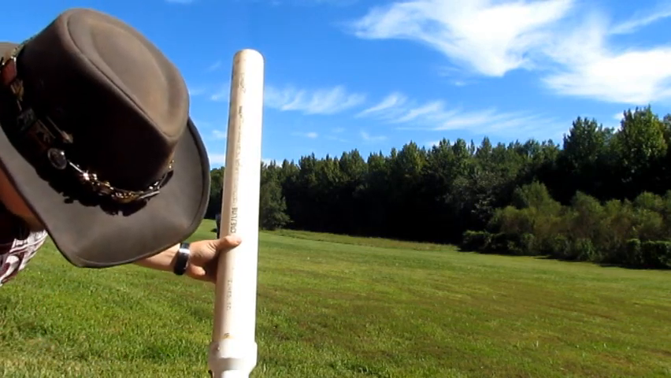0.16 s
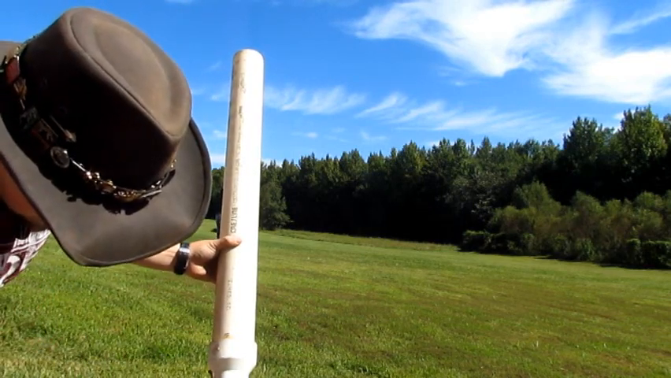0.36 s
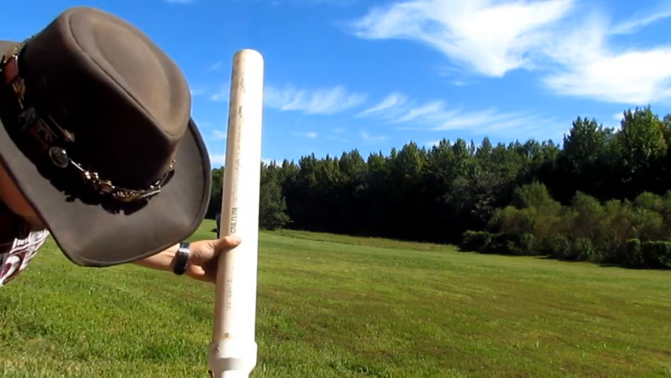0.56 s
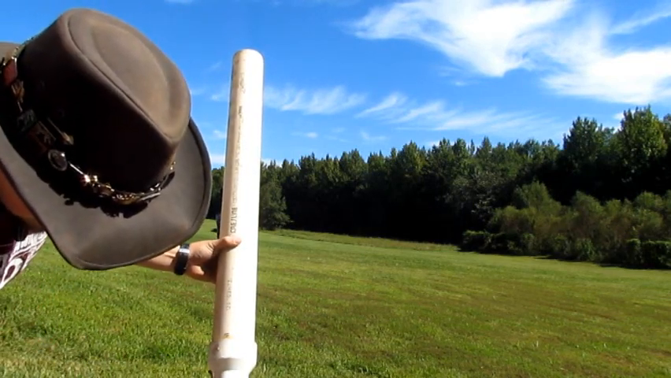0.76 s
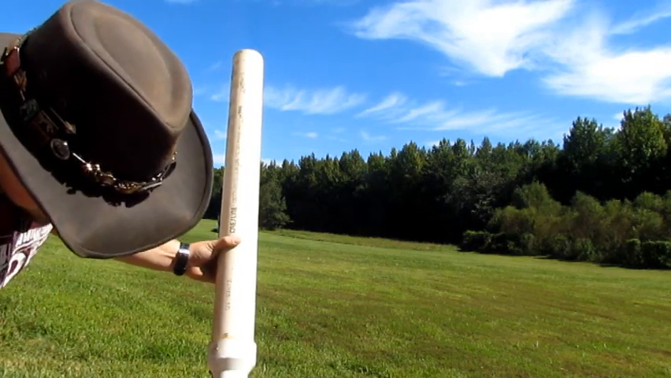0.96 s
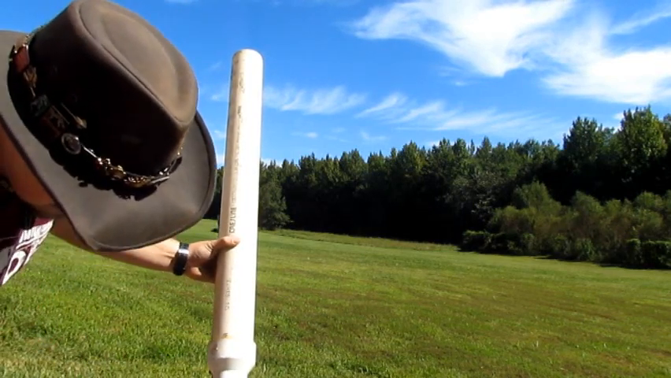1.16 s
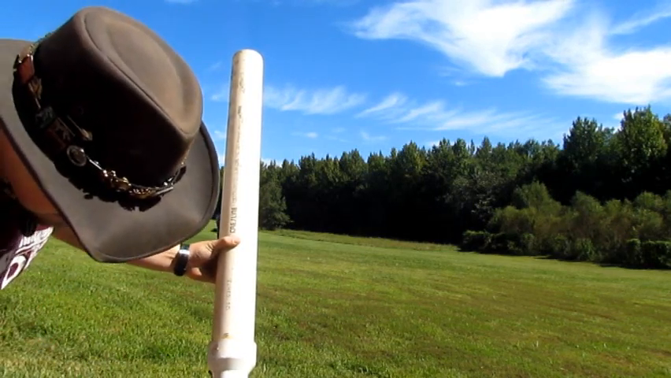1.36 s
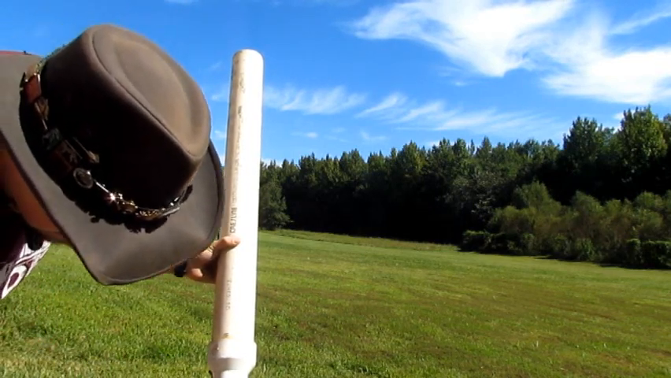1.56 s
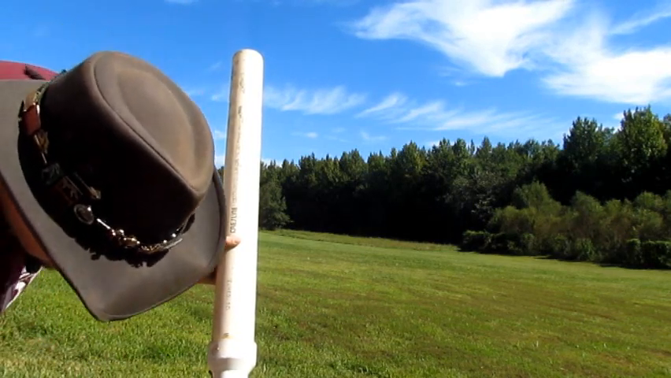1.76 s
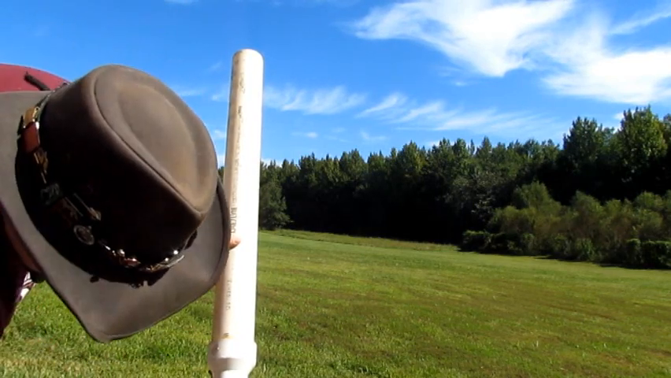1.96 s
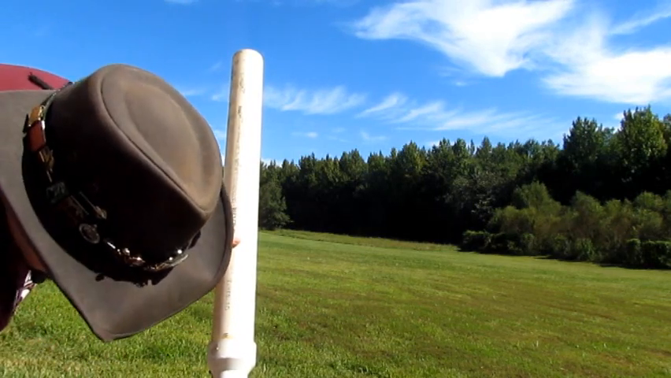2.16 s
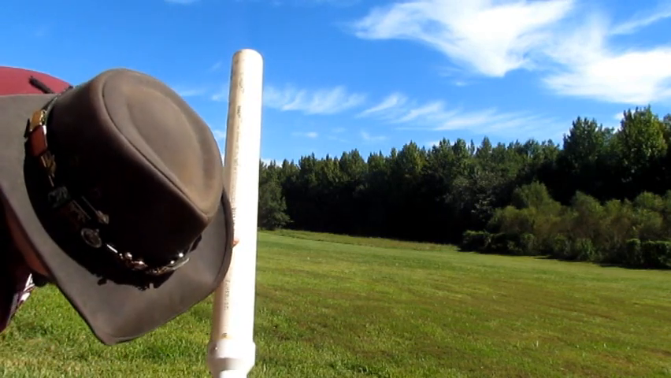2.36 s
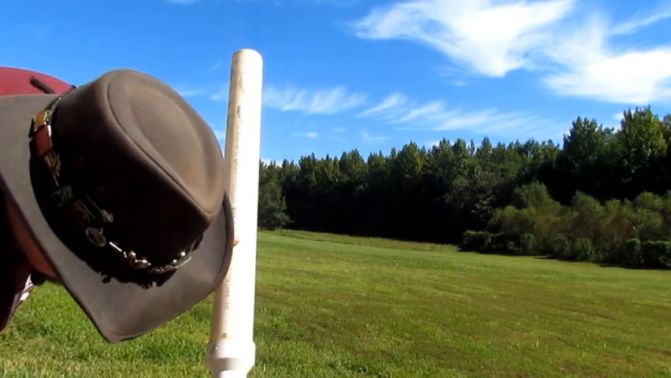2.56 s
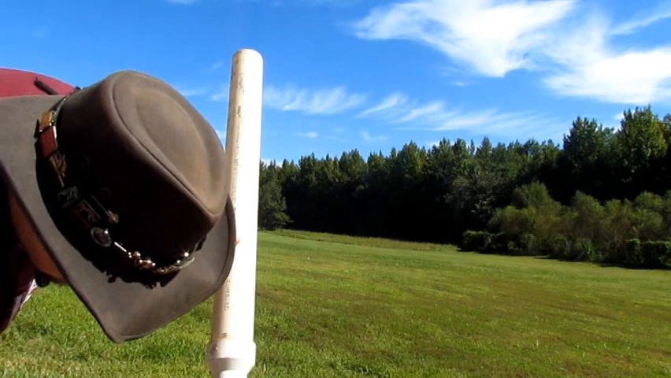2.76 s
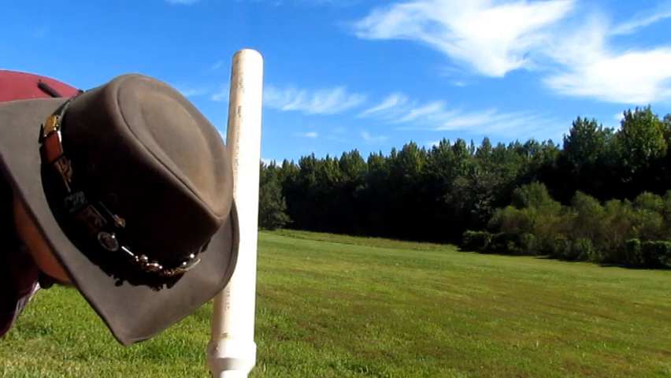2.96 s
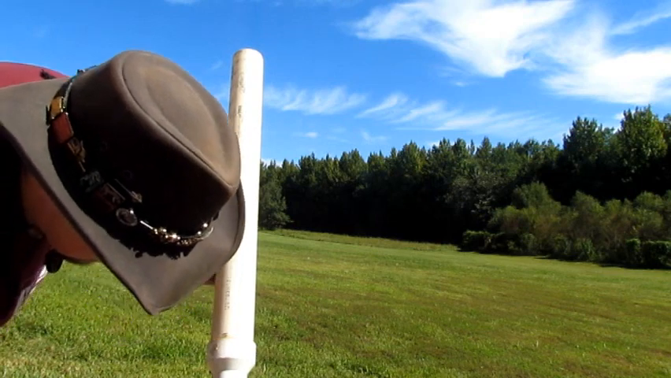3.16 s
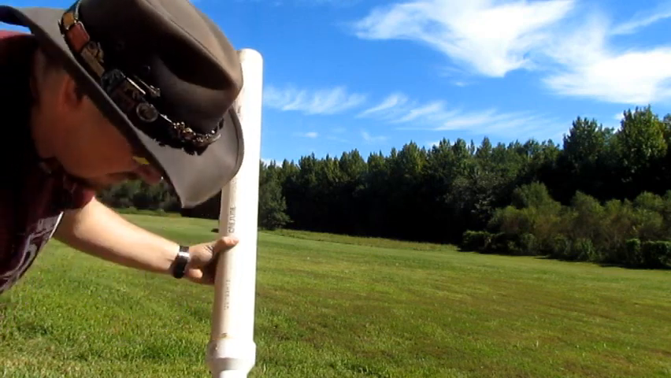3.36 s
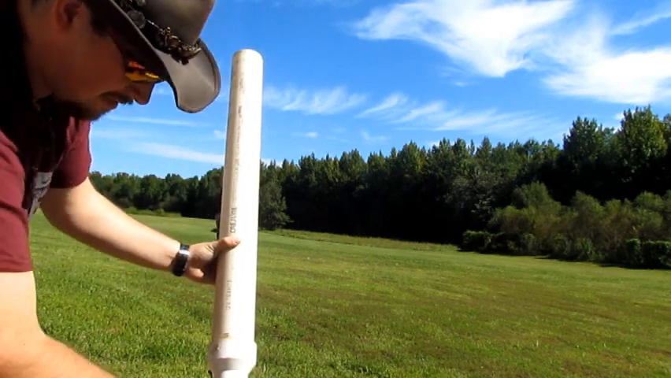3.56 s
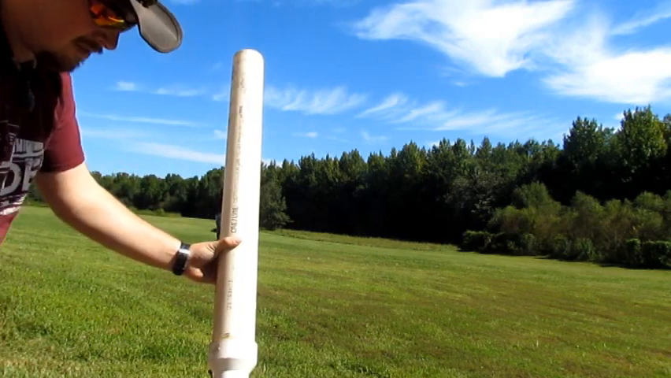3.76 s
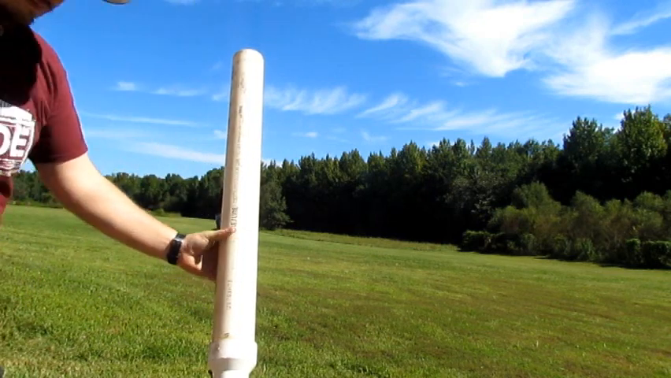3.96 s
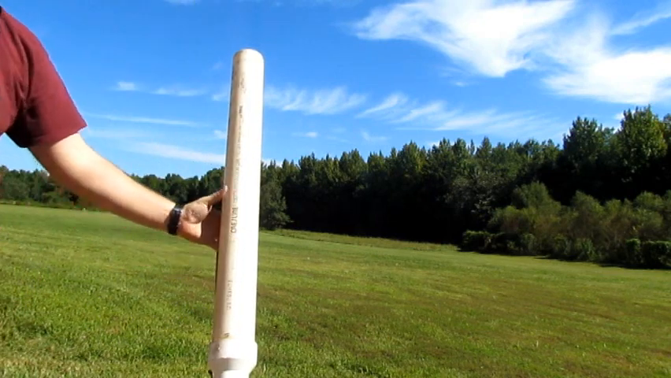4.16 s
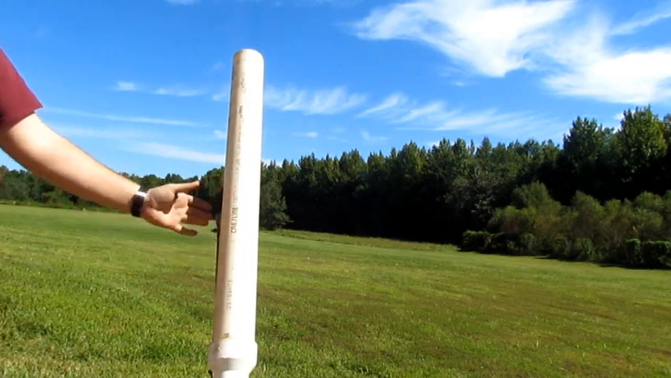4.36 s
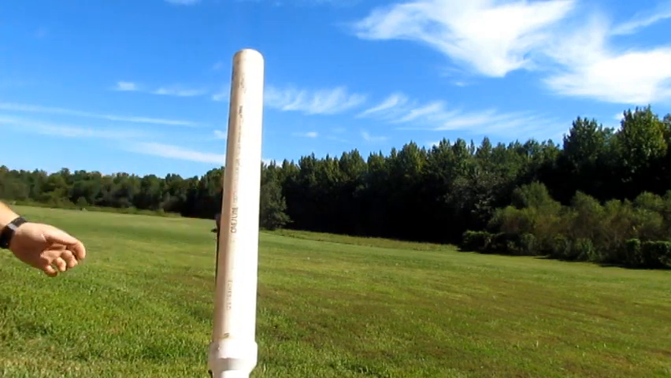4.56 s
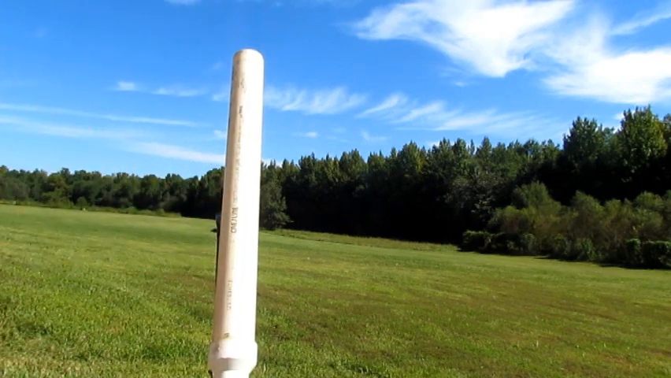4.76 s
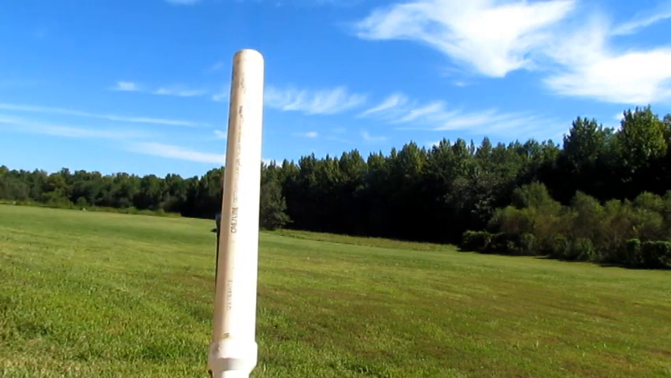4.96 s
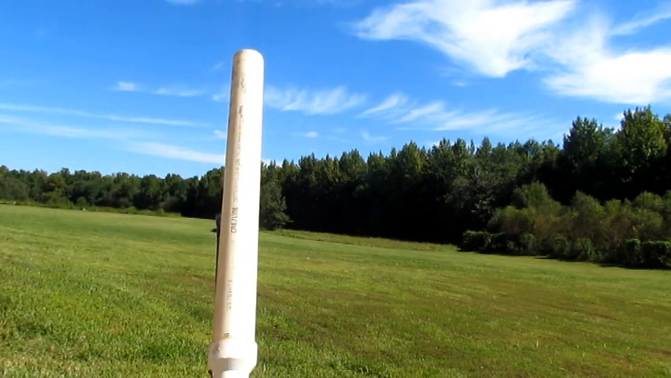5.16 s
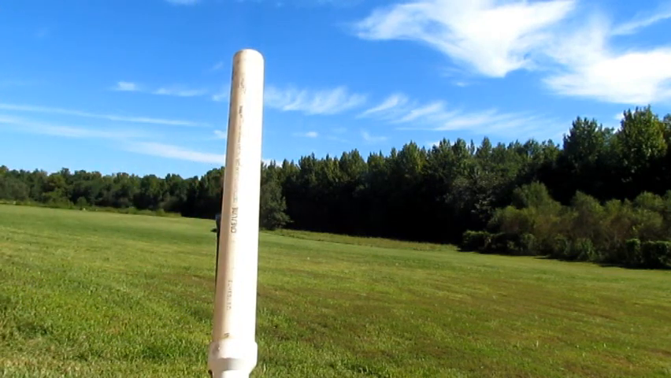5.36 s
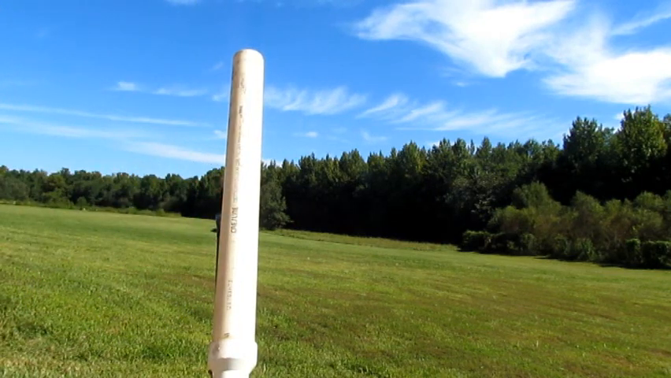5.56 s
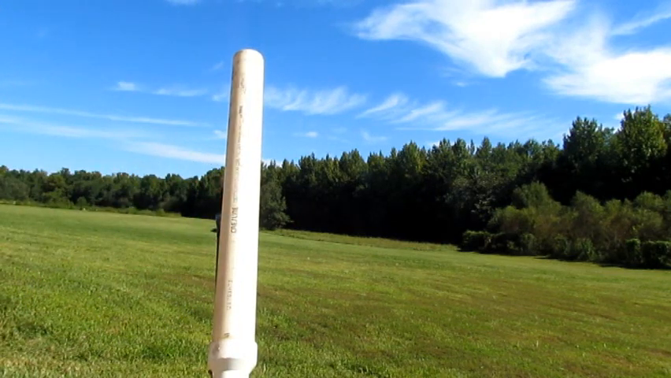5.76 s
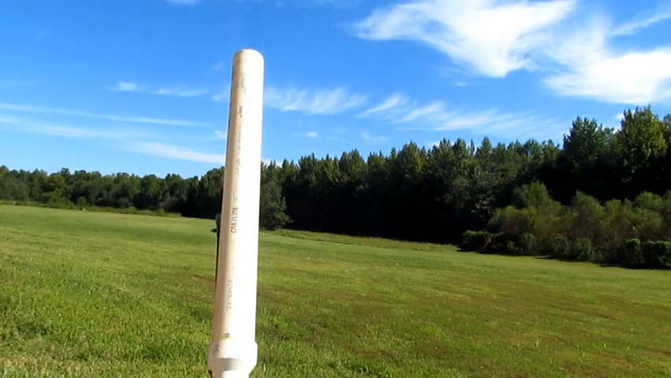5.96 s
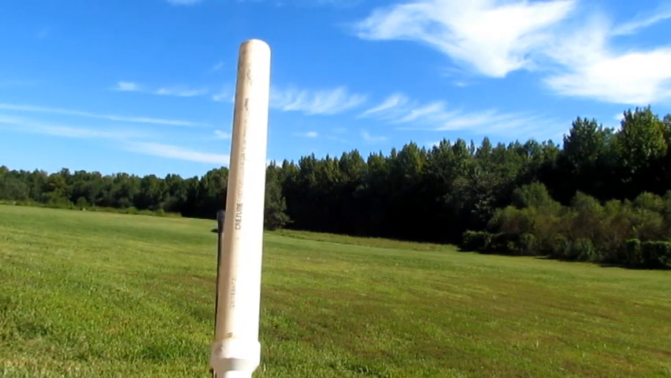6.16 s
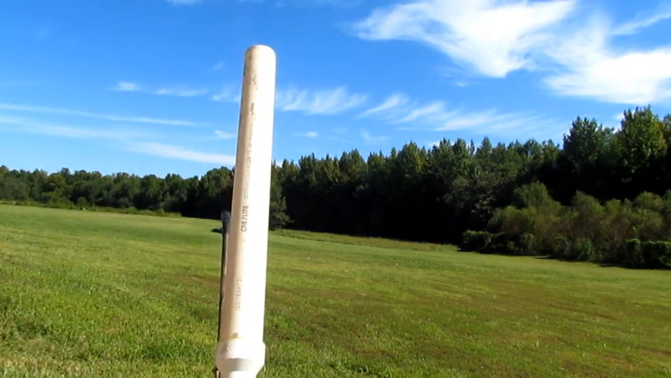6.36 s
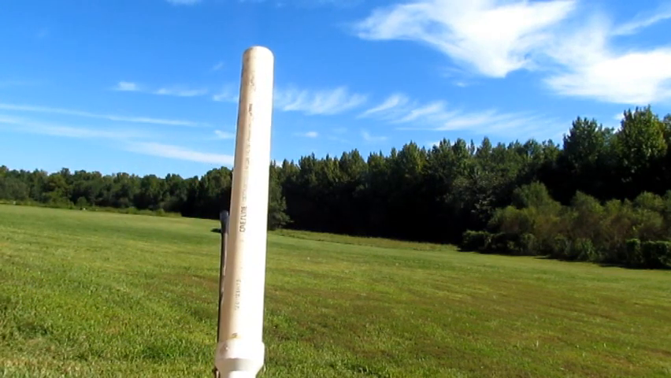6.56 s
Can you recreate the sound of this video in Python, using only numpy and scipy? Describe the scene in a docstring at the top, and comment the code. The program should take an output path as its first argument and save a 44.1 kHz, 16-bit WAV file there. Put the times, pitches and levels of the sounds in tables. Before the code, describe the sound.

In an open mown field, throbbing cicadas and chirping katydids buzz steadily all round. Hands faintly tap and brush a plastic pipe, a valve spits a short shrill hiss, dry crackle and a sharp fitting click follow. After a pause, a close compressed-air cannon fires a roaring bang; a dull wash and slaps return from the trees. Close stereo microphones; insects duck after loud sounds.

```python
"""The roaring bang of a compressed-air potato cannon, close by in a mown field; the tree line throws it back.
Before it, air spits from the filling valve, hands shift on the plastic pipe and a fitting clicks.
Air jets are coloured noise under envelopes; hard contacts are knocks and grit ringing resonances.
Cicadas and katydids, made of narrow noise bands and pulsed tones, sing all round two microphones.
The recorder's gain control ducks everything after loud sounds and recovers slowly."""
import sys
import numpy as np
from scipy import signal
from scipy.fft import rfft, irfft, next_fast_len
from scipy.io import wavfile
from scipy.ndimage import uniform_filter1d

SR = 44100
rng = np.random.default_rng(int(sys.argv[2]) if len(sys.argv) > 2 else 0)


def digitize_waveform(pressure):
    """Quantize a signal to 16-bit integers and store it at the path in sys.argv[1].

    Rows of a 2-D input are taken as channels; values are limited to [-1, 1].
    """
    field = np.atleast_2d(pressure).T
    bounded = np.clip(field, -1, 1)
    quanta = np.round(bounded * 32767).astype(np.int16)
    wavfile.write(sys.argv[1], SR, quanta)


N = 291501
TIME = np.arange(N) / SR
SIZE = next_fast_len(N, True)
BINS = np.maximum(np.arange(SIZE // 2 + 1) * SR / SIZE, 1)   # spectrum frequencies [Hz]

# the main valve unseats, then opens fully
UNSEAT_S, OPEN_S = 6.119, 6.157
# colour of the roar: (frequency [Hz], level [dB])
ROAR_COLOUR = [(60, -17), (150, -18), (300, -12), (480, -3.5), (780, 2), (1050, -4), (1500, -6),
               (2400, -5.5), (3800, -7), (5500, -7), (9000, -16.5), (15000, -42)]
# colour of the escaping hiss: (frequency [Hz], level [dB])
ROAR_HISS_COLOUR = [(1500, -11), (3500, -6), (5500, -7), (7500, -2.5), (10500, -1), (12500, -7),
                    (15500, -18)]
# colour of the deep boom: (frequency [Hz], level [dB])
BOOM_COLOUR = [(25, -18), (60, -14), (110, -8), (190, 1.5), (260, -11), (370, 3.5), (700, -34), (2000, -45)]
# narrow peaks in the roar's colour: (frequency [Hz], width [Hz], lift [dB])
ROAR_PEAKS = [(504, 43, 5), (668, 30, 2.5), (775, 90, 0), (1266, 60, 5.5), (1505, 96, 8.5), (1790, 41, 10),
              (1940, 68, 7), (2300, 80, 1), (2490, 40, 7), (2710, 46, 8), (3800, 120, 4), (5170, 90, -4)]


def shot(pop_s=6.137, pop_width_s=0.00031):
    """The valve cracks open, a pulse leaves the muzzle and the tank empties; hiss dies first, boom last."""
    leak = envelope(UNSEAT_S, level_db=-28, attack_s=.003, hold_s=.014,
                    slope_db_per_s=-750, release_db_per_s=250)
    pushed_air = envelope(pop_s - pop_width_s * 8, level_db=-29.5, attack_s=.003, hold_s=.02,
                          slope_db_per_s=-350, release_db_per_s=300)
    roar = envelope(OPEN_S, level_db=3.8, attack_s=.02, hold_s=.096, slope_db_per_s=3, release_db_per_s=440)
    hiss = envelope(OPEN_S, level_db=1.5, attack_s=.02, hold_s=.06, slope_db_per_s=50, release_db_per_s=330)
    boom = envelope(OPEN_S, level_db=-17, attack_s=.014, hold_s=.095, slope_db_per_s=72, release_db_per_s=230)
    ragged = from_db(2.2 * drift(120))
    roar = (pushed_air + roar) * ragged * turbulence(ROAR_COLOUR, alike=0.85, resonances=ROAR_PEAKS)
    hiss = (leak + hiss) * from_db(1.1 * drift(120)) * turbulence(ROAR_HISS_COLOUR, alike=0.39)
    boom = boom * turbulence(BOOM_COLOUR, alike=0.85)
    pop = muzzle_pulse(pop_s, pop_width_s)
    blast = place(roar + roar_surges() + boom + pop, pan_db=-0.4, lag=-1.1)
    return blast + place(hiss, pan_db=-0.5, lag=-.55)


def muzzle_pulse(pop_s, width_s):
    """A pressure pulse at the muzzle: one push outward, then an equal suction."""
    age = (TIME - pop_s) / width_s
    return -from_db(-21) * age * np.exp(-age ** 2 / 2)


def roar_surges(count=6, span_s=.105, length_s=.012, low_hz=450, high_hz=2000, width_share=.55):
    """Short noise surges at random pitches and slightly random times roughen the roar."""
    rows = []
    for k, (when, pitch) in enumerate(rng.random((count, 2))):
        hz = low_hz * (high_hz / low_hz) ** pitch
        start_s = OPEN_S + length_s + span_s * (k + when) / count
        rows.append((start_s, -1.5, hz, width_share * hz, length_s))
    return puffs(rows, alike=1.0, rise=0.26)


# colour of the wash from the trees: (frequency [Hz], level [dB])
TREE_COLOUR = [(40, -18), (160, -11), (400, -0.5), (800, 1), (1500, -2), (2800, 0), (4500, -4), (7000, -12),
               (11000, -14.5), (15000, -38)]
# distinct slaps from the tree line: (time [s], level [dB])
TREE_SLAPS = [(6.432, -12.5), (6.454, -18), (6.488, -14.5), (6.5085, -17), (6.546, -24)]
# bands of each slap: (frequency [Hz], width [Hz], level [dB])
SLAP_BANDS = [(720, 1300, 0), (3200, 2600, -5)]
SLAP_S = .008


def tree_line():
    """The bang comes back from the trees as a dull wash with a few slaps and a sinking rumble."""
    wash = envelope(6.29, level_db=-18, attack_s=.14, hold_s=.07, slope_db_per_s=-45, release_db_per_s=75)
    wash = wash * from_db(0.86 * drift(80)) * turbulence(TREE_COLOUR, alike=0.52)
    rows = [(s, db + level, hz, width, SLAP_S) for s, db in TREE_SLAPS for hz, width, level in SLAP_BANDS]
    slaps = puffs(rows, alike=1.0, rise=0.15)
    return place(wash + slaps + returning_rumble(), pan_db=-1.0, lag=1.0)


def returning_rumble(start_s=6.488, start_hz=200, fall_hz_per_s=380):
    """The low end of the shot comes back late: two narrow noise bands sinking in pitch."""
    hz = start_hz - fall_hz_per_s * np.clip(TIME - start_s, 0, None)
    level = envelope(start_s, level_db=-24, attack_s=.016, hold_s=.02, slope_db_per_s=-60, release_db_per_s=110)
    return level * (rasp(hz, width_hz=60) + .45 * rasp(1.8 * hz, width_hz=90))


VENT_S = 2.238   # the filling valve starts to spit
# colour of the shrill top: (frequency [Hz], level [dB])
VENT_TOP_COLOUR = [(5000, -8), (7400, -4.5), (8700, -11), (10400, 1.5), (11700, -3), (13500, -11),
                   (15500, -27)]
# colour of the hiss: (frequency [Hz], level [dB])
VENT_HISS_COLOUR = [(1000, -37), (1800, -8), (2600, -2.5), (3500, -3.5), (4300, -2), (5700, 0.5),
                    (7500, -9.5), (9000, -1.5), (12000, -15)]
# colour of the low rush: (frequency [Hz], level [dB])
VENT_RUSH_COLOUR = [(60, -22), (250, -17.5), (550, -1), (900, -1), (1150, -9.5), (1600, -1), (2500, -12),
                    (4000, -57)]
# valve resonances: (frequency [Hz], width [Hz], lift [dB])
VALVE_RESONANCES = [(943, 80, 11), (1320, 98, 12), (3090, 66, 8.5), (3500, 190, 9), (4790, 160, 1),
                    (5850, 300, 4), (7350, 340, 8), (10530, 300, 4)]


def filling_valve():
    """A spit of air: the shrill top weakens as the pressure falls, while a duller hiss swells."""
    top = envelope(VENT_S, level_db=-14.2, attack_s=.02, hold_s=.145, slope_db_per_s=-100, release_db_per_s=450)
    hiss = envelope(VENT_S, level_db=-24.5, attack_s=.022, hold_s=.072, slope_db_per_s=105, release_db_per_s=185)
    rush = envelope(VENT_S, level_db=-33, attack_s=.035, hold_s=.19, slope_db_per_s=-22, release_db_per_s=400)
    top = top * from_db(0.99 * drift(82)) * turbulence(VENT_TOP_COLOUR, 0.67, VALVE_RESONANCES)
    hiss = hiss * from_db(1.1 * drift(120)) * turbulence(VENT_HISS_COLOUR, 1.0, VALVE_RESONANCES)
    rush = rush * from_db(1.1 * drift(60)) * turbulence(VENT_RUSH_COLOUR, 0.99, VALVE_RESONANCES)
    body = place(hiss + rush + valve_stem(), pan_db=-0.8, lag=-1.2)
    return body + place(top, pan_db=-2.5, lag=-0.68)


# short squeaks of the valve: (time [s], level [dB], pitch [Hz])
VALVE_SQUEAKS = [(2.252, -24, 7450), (2.303, -24, 3560), (2.311, -21, 5730)]
# the stem jolts as it is pressed: (time [s], level [dB])
STEM_JOLTS = [(2.269, -41), (2.28, -42)]
SQUEAK_WIDTH_HZ, SQUEAK_S = 230, .018
JOLT_HZ, JOLT_WIDTH_HZ, JOLT_S = 270, 520, .008


def valve_stem():
    """The pressed stem jolts twice as low bursts; squeaks are short narrow bursts."""
    squeaks = [(s, db, hz, SQUEAK_WIDTH_HZ, SQUEAK_S) for s, db, hz in VALVE_SQUEAKS]
    jolts = [(s, db, JOLT_HZ, JOLT_WIDTH_HZ, JOLT_S) for s, db in STEM_JOLTS]
    return puffs(squeaks + jolts, alike=0.95, rise=0.19)


# light ticks of the hand on the pipe: (time [s], level [dB])
HAND_TICKS = [(.899, -38), (.927, -42), (1.848, -37), (2.626, -39), (3.726, -29), (3.733, -28), (3.76, -30),
              (3.847, -28), (3.912, -34)]
# pipe wall resonances: (frequency [Hz], width [Hz], level [dB])
PIPE_RESONANCES = [(1350, 460, -7), (1800, 450, -3), (3200, 640, 3), (4300, 990, 2)]
# plastic fitting clicks: (time [s], level [dB])
FITTING_CLICKS = [(4.4045, -13.5), (4.4365, -26), (4.4445, -24), (4.4745, -22), (4.509, -31)]
# fitting resonances: (frequency [Hz], width [Hz], level [dB])
FITTING_RESONANCES = [(1234, 55, 4), (1720, 210, -3), (2320, 320, -3.5), (3860, 460, -3), (5150, 380, 2),
                      (7240, 1700, -5), (10000, 1900, -5.5), (12300, 1200, -4.5)]
# dry crackle underfoot: (time [s], level [dB])
FOOT_CRACKLE = [(3.6324, -16), (3.6416, -12), (3.6454, -12), (3.6504, -17), (3.6574, -17), (3.6604, -13),
                (3.6674, -18)]
# crackle resonances: (frequency [Hz], width [Hz], level [dB])
TWIG_RESONANCES = [(1400, 2400, -20), (2880, 1140, -5), (3640, 790, 2.5), (4430, 910, -1), (6700, 2000, -7),
                   (10900, 3300, -10.5)]


def handling():
    """Hands on the pipe, a crackle underfoot and fitting clicks: each hard contact rings its body."""
    ticks = snaps(HAND_TICKS, PIPE_RESONANCES, contact_s=.0015, alike=0.9)
    crackle = snaps(FOOT_CRACKLE, TWIG_RESONANCES, contact_s=0.003, alike=0.86)
    clicks = snaps(FITTING_CLICKS, FITTING_RESONANCES, contact_s=0.0042, alike=0.88)
    return place(soft_touches() + ticks + crackle + clicks, pan_db=-0.5, lag=-1.13)


# hands and sleeves brush along the pipe: (time [s], level [dB], length [s], centre [Hz])
PIPE_BRUSHES = [(.32, -54, .042, 1000), (.65, -56, .026, 1200), (.897, -51.5, .026, 1500),
                (3.11, -53, .13, 1400), (3.70, -39.5, .047, 2500), (4.075, -48, .09, 2400),
                (4.685, -47, .015, 2000), (4.83, -44.5, .048, 2500)]
BRUSH_WIDTH = 1.0   # bandwidth as a share of the centre
# a firm brush also sizzles; the sizzle grows faster than the brush [dB per dB]
SIZZLE_HZ, SIZZLE_WIDTH_HZ, SIZZLE_FROM_DB, SIZZLE_GROWTH = 11200, 3800, -42.5, 1.7
# soft bumps that sound the hollow of the pipe: (time [s], level [dB], length [s])
PIPE_BUMPS = [(.897, -53.5, .084), (1.565, -52.5, .02), (1.845, -47, .02), (3.11, -52, .16),
              (3.635, -48.5, .052), (3.722, -46.5, .023), (4.41, -56, .05), (4.685, -55, .02)]
# hollow resonances: (frequency [Hz], width [Hz], level [dB])
HOLLOW_BANDS = [(560, 240, 0), (245, 110, -12)]
# dull knocks on the pipe wall: (time [s], level [dB], length [s], centre [Hz])
WALL_KNOCKS = [(1.408, -44, .0094, 1400), (1.56, -47, .021, 1630), (3.724, -41, .016, 1900),
               (3.985, -53, .05, 1620), (4.218, -43.5, .011, 1650), (4.685, -44.5, .022, 1650)]
KNOCK_WIDTH_HZ = 600


def soft_touches():
    """Brushes, bumps and knocks are band-noise bursts, roughened as cloth catches and slips."""
    rubs, sizzles = [], []
    for s, db, length, hz in PIPE_BRUSHES:
        sizzle_db = SIZZLE_FROM_DB + SIZZLE_GROWTH * (db - SIZZLE_FROM_DB)
        rubs.append((s, db, hz, BRUSH_WIDTH * hz, length))
        sizzles.append((s, sizzle_db, SIZZLE_HZ, SIZZLE_WIDTH_HZ, length))
    bumps = [(s, db + level, hz, width, length)
             for s, db, length in PIPE_BUMPS for hz, width, level in HOLLOW_BANDS]
    knocks = [(s, db, hz, KNOCK_WIDTH_HZ, length) for s, db, length, hz in WALL_KNOCKS]
    return puffs(rubs + sizzles + bumps + knocks, alike=0.89, rise=0.057) * from_db(2 * drift(220))


# the nearest throbbing cicada: (time [s], level [dB])
THROB_LEVEL = [(0, -46), (.7, -44), (2.2, -44), (2.8, -50), (6.6, -51)]


def throbbing_cicada():
    """Its abdomen pumps: each throb switches the song from a low resonance to a higher, brighter one."""
    level_db, = in_time(THROB_LEVEL)
    effort = .5 + .5 * np.tanh(3 * (throbs() + 0.25))
    # the tymbal buckles hundreds of times a second
    ribs = 1 + .5 * np.cos(2 * np.pi * turns_of(335 + 20 * drift(3)))
    tense = rasp(6400, width_hz=200) + 0.29 * rasp(6800, width_hz=400) + 0.92 * rasp(7300, width_hz=1400)
    slack = .5 * rasp(5350, width_hz=370)
    song = ribs * (effort * tense + (1 - effort) * slack)
    return place(from_db(level_db) * song, pan_db=-2.5, lag=-0.94)


def throbs(per_s=8.22, speedup_per_s2=.092, first_s=.108):
    """The slowly quickening rhythm that neighbouring cicadas share, from -1 in the gaps to 1."""
    return np.cos(2 * np.pi * (turns_of(per_s + speedup_per_s2 * TIME) - per_s * first_s))


def trilling_cicada():
    """A fast trill of syllables that each slide down in pitch."""
    syllable = turns_of(32.8 + .5 * drift(1)) % 1
    voice = rasp(8520 - 750 * syllable ** 2, width_hz=190) * np.sqrt(np.abs(np.sin(np.pi * syllable)))
    return place(from_db(-47.5) * voice, pan_db=2, lag=1.0)


# each chirps at its own steady pace:
# (first chirp [s], last chirp [s], period [s], pitch [Hz], level [dB])
KATYDID_SONGS = [(.138, 6.1, .2566, 9560, -52.5), (.69, 3.2, .2025, 10230, -58)]


def katydids(chirp_s=.07, stroke_hz=122, uneven_db=1.3, uneven_hz=35):
    """Each chirp is a handful of wing strokes on a wavering tone; no two are quite alike."""
    out, age = np.zeros(N + SR), TIME[:int(chirp_s * SR)]
    strokes = np.sin(np.pi * stroke_hz * age) ** 2 * signal.windows.tukey(len(age), .5)
    for first, last, period, hz, db in KATYDID_SONGS:
        chirp_times = np.arange(first, last, period)
        for s, (louder, higher) in zip(chirp_times, rng.standard_normal((len(chirp_times), 2))):
            waver = np.cumsum(rng.normal(0, 0.083, len(age)))
            phase = 2 * np.pi * (hz + uneven_hz * higher) * age + waver
            start = int((s - chirp_s / 2) * SR)
            out[start:start + len(age)] += 2 * from_db(db + uneven_db * louder) * strokes * np.sin(phase)
    return place(out[:N], pan_db=-12, lag=1.0)


# colour of the far chorus: (frequency [Hz], level [dB])
CHORUS_COLOUR = [(2300, -21), (2900, -19), (3300, -12), (3650, -14.5), (3950, -7.5), (4750, -9), (5300, -2),
                 (6200, -2), (7300, -2), (8350, 0.5), (8650, -14), (8900, -9.5), (10200, -16.5),
                 (11000, -26)]
# the far chorus: (time [s], level [dB])
CHORUS_LOUDNESS = [(0, -40.5), (.6, -37), (2.1, -36), (2.9, -37.5), (4.4, -35.7), (6.0, -37.5), (6.6, -40)]
# single voices that stand out: (frequency [Hz], width [Hz], lift [dB])
CHORUS_VOICES = [(3830, 27, 6.5), (4060, 12, 8), (4470, 68, 3.5), (5670, 28, 4.5), (5930, 35, 7),
                 (6300, 46, 4), (7680, 60, 5), (7920, 80, 4.5), (8430, 65, 4.5)]


def chorus():
    """Many far cicadas merge into a sizzle of coloured noise that throbs slightly."""
    level_db, = in_time(CHORUS_LOUDNESS)
    swell = from_db(level_db + 0.74 * drift(17) + 0.57 * throbs())
    crowd = swell * turbulence(CHORUS_COLOUR, alike=0.55, resonances=CHORUS_VOICES)
    return place(crowd, pan_db=-2.5, lag=2.19)


# bouts of the lower insect: (time [s], level [dB])
LOW_BOUTS = [(.3, -56.5), (.716, -58), (2.822, -62), (3.21, -57), (4.53, -57), (5.076, -59), (5.475, -57)]
BOUT_S = .19


def low_rasp():
    """A lower insect rasps in bouts of one length."""
    bouts = sum(from_db(db) * np.exp(-(2 * (TIME - s) / BOUT_S) ** 4) for s, db in LOW_BOUTS)
    return bouts * rasp(3300, width_hz=350)


# high insect buzz: (time [s], level [dB])
HIGH_BUZZ_LEVEL = [(0, -56), (.94, -55), (.98, -67), (6.6, -97)]


def high_buzz():
    """A high insect buzz of one broad and two narrow bands drops early and then fades."""
    level_db, = in_time(HIGH_BUZZ_LEVEL)
    buzz = 0.91 * rasp(11950, width_hz=2400) + .3 * rasp(11800, width_hz=120) + .35 * rasp(12300, width_hz=140)
    return from_db(level_db) * buzz


def far_bird(start_s=5.803, start_hz=3345, fall_hz_per_s=1350):
    """A far bird's falling whistle, a narrow noise band unsteady in pitch and loudness."""
    hz = start_hz - fall_hz_per_s * np.clip(TIME - start_s, 0, 1) + 25 * drift(9)
    level = envelope(start_s, level_db=-55.5, attack_s=.025, hold_s=.26, slope_db_per_s=-5, release_db_per_s=600)
    return level * from_db(2.5 * drift(14)) * rasp(hz, width_hz=79)


# faint fluttering whirr: (time [s], pitch [Hz], level [dB])
WHIRR_COURSE = [(0, 775, -68), (2.2, 775, -67), (2.8, 764, -63), (6.6, 768, -63.5)]


def whirr():
    """A faint tone with a little narrow noise, fluttering about 22 times a second."""
    hz, level_db = in_time(WHIRR_COURSE)
    flutter = (1 + np.cos(2 * np.pi * turns_of(22.1))) ** 1.2
    tone = 0.84 * np.sin(2 * np.pi * turns_of(hz)) + 0.16 * rasp(hz, width_hz=210)
    return from_db(level_db) * flutter * tone


# faint hum: (frequency [Hz], level [dB])
HUM_TONES = [(547, -70.5), (866, -74), (935, -71)]
# the hum sags and fades: (time [s], level [dB], pitch [ratio])
HUM_COURSE = [(0, -3, 1), (2.2, 0, 1), (2.8, -3, 1), (3.8, 1, 0.95), (4.6, -10, 1), (6.6, -20, 0.99)]


def hum():
    """A faint hum of very narrow bands that sag in pitch together and fade."""
    level_db, sag = in_time(HUM_COURSE)
    return from_db(level_db) * sum(from_db(db) * rasp(hz * sag, width_hz=5.7) for hz, db in HUM_TONES)


# colour of the open air: (frequency [Hz], level [dB])
AIR_COLOUR = [(25, -18), (60, -1.5), (100, -0.5), (200, -1), (350, -1.5), (600, 2), (900, -0.5), (1300, 0),
              (2500, -4.5), (6000, -6.5), (11000, -5), (13000, -8.5), (15500, -44.5)]


def open_air():
    """The open air of the field: steady coloured noise."""
    return from_db(-54.5) * turbulence(AIR_COLOUR, alike=0.39)


def from_db(db):
    """Decibels to gain."""
    return 10 ** (np.asarray(db) / 20)


def rms_one(x):
    """Scale to rms 1."""
    return x / np.sqrt(np.mean(np.abs(x) ** 2) + 1e-20)


def in_time(rows):
    """Each column of a curve at every sample."""
    s, *columns = np.transpose(rows)
    return [np.interp(TIME, s, c) for c in columns]


def turns_of(rate):
    """Cycles completed at a steady or changing rate [Hz]."""
    return np.cumsum(rate * np.ones(N)) / SR


def drift(rate):
    """Slow chance with spread 1; a higher rate [Hz] wanders faster."""
    step = 40   # samples between the slow values
    r = np.exp(-2 * np.pi * step * rate / SR)
    noise = rng.standard_normal(N // step + 2002)
    slow = signal.lfilter([1], [1, -2 * r, r * r], noise)[2000:]   # drop the settling
    return np.interp(np.arange(N) / step, np.arange(len(slow)), rms_one(slow))


def envelope(start_s, level_db, attack_s, hold_s, slope_db_per_s, release_db_per_s):
    """Gain that swells, holds on a slope and then dies away."""
    age = TIME - start_s
    held = np.clip(age - attack_s, 0, hold_s)
    released = np.maximum(age - attack_s - hold_s, 0)
    swell = np.sin(np.pi / 2 * np.clip(age / attack_s, 0, 1)) ** 2
    return swell * from_db(np.maximum(level_db + slope_db_per_s * held - release_db_per_s * released, -200))


def resonate(x, hz, width_hz):
    """One resonance, gain 1 on top."""
    r = np.exp(-np.pi * width_hz / SR)
    feed = np.array([1, 0, -1]) * (1 - r * r) / 2
    return signal.lfilter(feed, [1, -2 * r * np.cos(2 * np.pi * hz / SR), r * r], x + 1e-18)


def white_pair(alike, size=N):
    """White noise at two microphones with the given correlation."""
    mid, side = rng.standard_normal((2, size))
    alike = np.clip(alike, -1, 1)
    return (np.sqrt(1 + alike) * mid + np.sqrt(1 - alike) * side * [[1], [-1]]) / np.sqrt(2)


def place(x, pan_db, lag):
    """Direction at the microphones: left louder by pan_db and later by lag samples."""
    left, right = np.broadcast_to(x, (2, N))
    left = irfft(rfft(left, SIZE) * np.exp(-2j * np.pi * BINS * lag / SR), SIZE)[:N]
    return np.array([left * from_db(pan_db / 2), right * from_db(-pan_db / 2)])


def turbulence(spectrum, alike, resonances=()):
    """Stereo noise with a broad colour, lifted at narrow peaks; rms 1."""
    hz, db = np.transpose(spectrum)
    colour = np.interp(np.log(BINS), np.log(hz), db)
    for centre, width, lift in resonances:
        colour = colour + lift / (1 + (2 * (BINS - centre) / width) ** 2)
    skirts = np.minimum(BINS / hz[0], 1) ** 2 * np.minimum(hz[-1] / BINS, 1) ** 2
    return rms_one(irfft(rfft(white_pair(alike, size=SIZE)) * from_db(colour) * skirts)[:, :N])


def rasp(pitch_hz, width_hz):
    """A narrow noise band that follows a pitch, as of a membrane driven unevenly; rms 1."""
    lowpass = signal.butter(2, width_hz / 2, fs=SR, output="sos")
    a, b = signal.sosfilt(lowpass, rng.standard_normal((2, N)))
    phase = 2 * np.pi * turns_of(pitch_hz)
    return rms_one(a * np.cos(phase) + b * np.sin(phase))


def puffs(rows, alike, rise):
    """Short bursts of band noise that swell quickly and die away."""
    out = np.zeros((2, N))
    for s, db, hz, width_hz, length in rows:
        start = int(s * SR)
        age = TIME[:min(SR // 2, N - start)] / length
        shape = (1 - np.exp(-age / rise)) * np.exp(-age ** 2)
        band = white_pair(alike, size=SR // 2)
        for _ in range(2):
            band = resonate(band, hz, 1.18 * width_hz)
        out[:, start:start + len(age)] += from_db(db) * shape * rms_one(band)[:, :len(age)]
    return out


def snaps(rows, body, contact_s, alike, knock=6.2):
    """Each contact is a clean knock with brief grit; it rings the resonances of a body."""
    out, age = np.zeros((2, N)), TIME[:SR // 8]
    for s, db in rows:
        force = knock * (age == 0) + white_pair(alike, size=len(age)) * np.exp(-age / contact_s)
        hit = sum(from_db(level) * (-1) ** k * resonate(force, hz, width)
                  for k, (hz, width, level) in enumerate(body))
        start = int(s * SR)
        out[:, start:start + len(age)] += from_db(db) * hit / np.abs(hit).max()
    return out


def scene():
    """The cannon close by, insects all round, the open field behind."""
    cannon = shot() + tree_line() + filling_valve() + handling()
    insects = throbbing_cicada() + trilling_cicada() + katydids() + chorus() + low_rasp() + high_buzz()
    background = far_bird() + whirr() + hum() + open_air()
    return cannon + insects + background


def record(dry, threshold_db=-23, squeeze=0.77, release_db_per_s=13, cutoff_hz=15900):
    """The recorder's gain control grabs fast and lets go slowly; the top is cut."""
    power = uniform_filter1d(np.mean(dry ** 2, axis=0), size=260)
    level_db = 10 * np.log10(np.maximum(power, 1e-12))
    over_db = np.maximum(level_db - threshold_db, 0) * squeeze
    # the reduction jumps up with the level and sinks at the release rate
    held_db = np.maximum.accumulate(over_db + release_db_per_s * TIME) - release_db_per_s * TIME
    ducked = dry * from_db(-uniform_filter1d(held_db, size=90))
    return signal.sosfilt(signal.ellip(12, .1, 90, cutoff_hz, fs=SR, output="sos"), ducked)


dry = scene()
out = record(dry)
digitize_waveform(out)
```